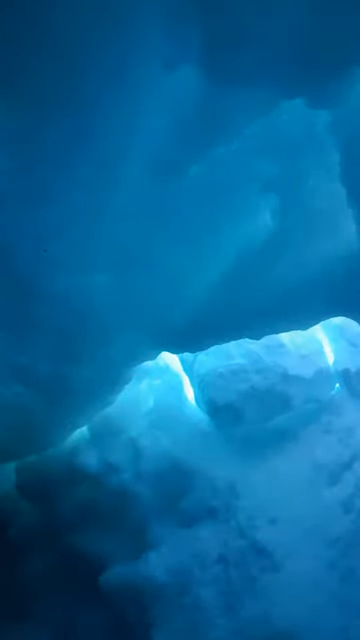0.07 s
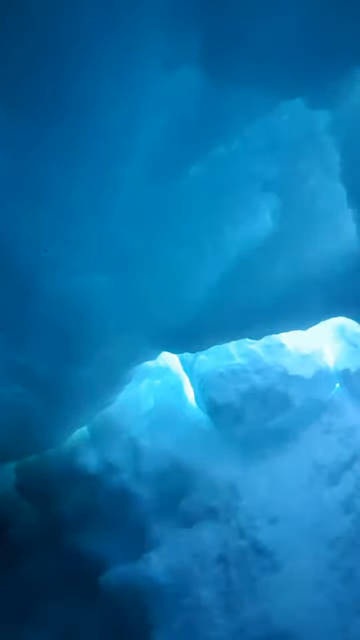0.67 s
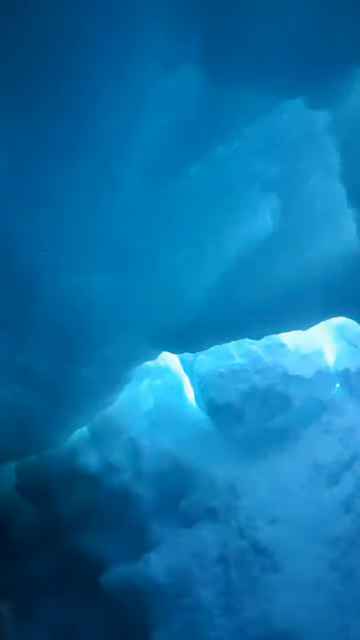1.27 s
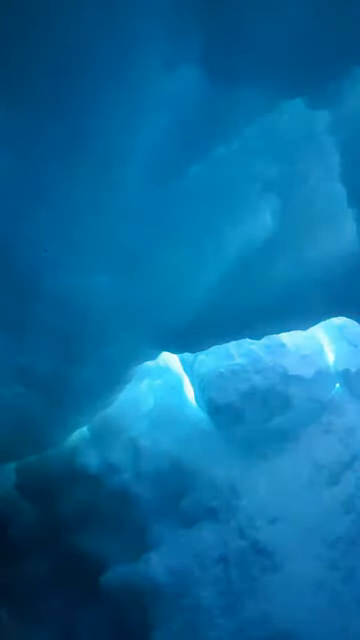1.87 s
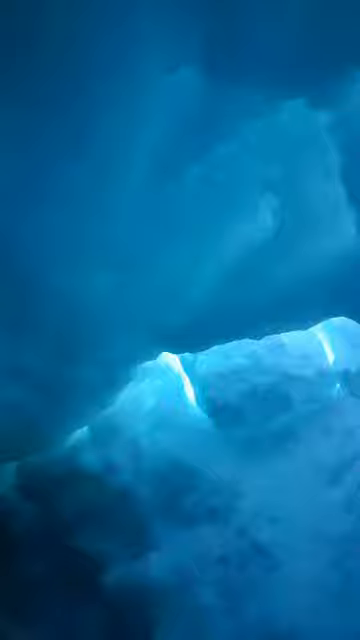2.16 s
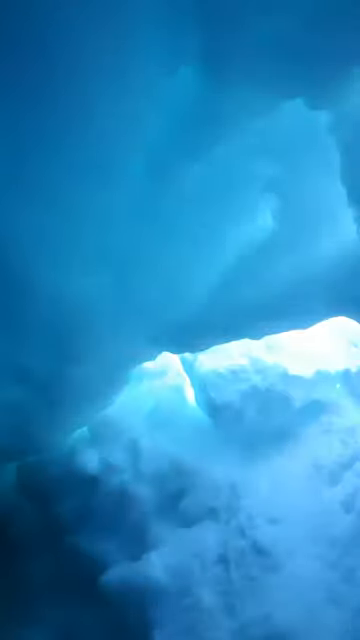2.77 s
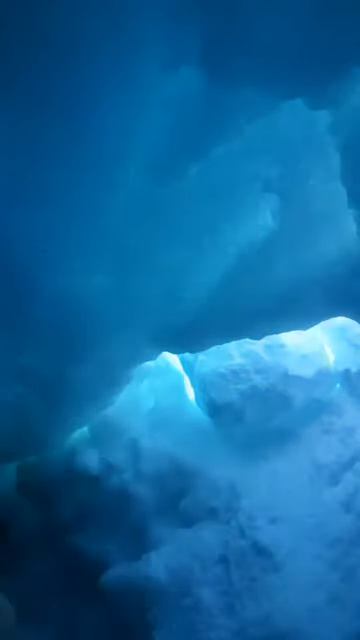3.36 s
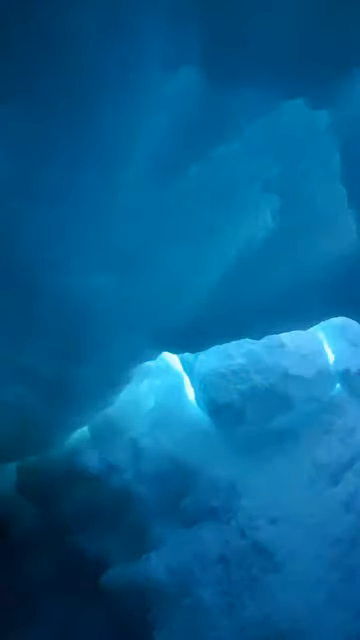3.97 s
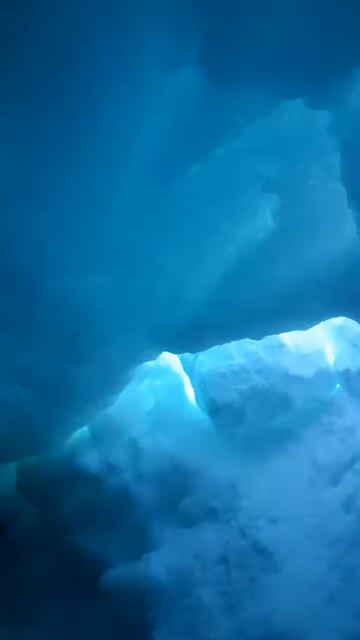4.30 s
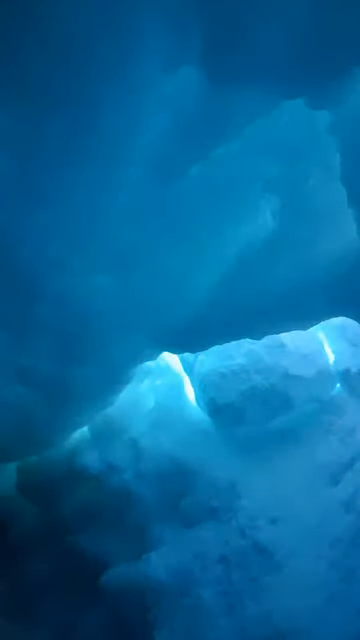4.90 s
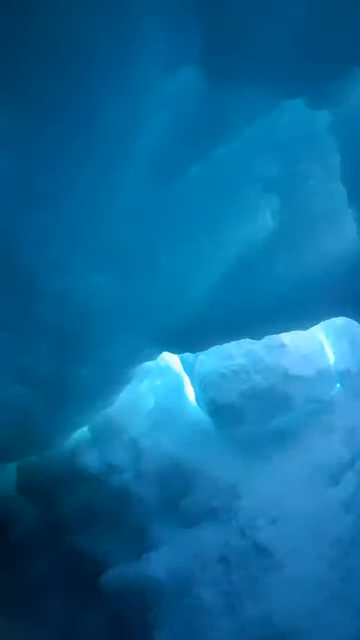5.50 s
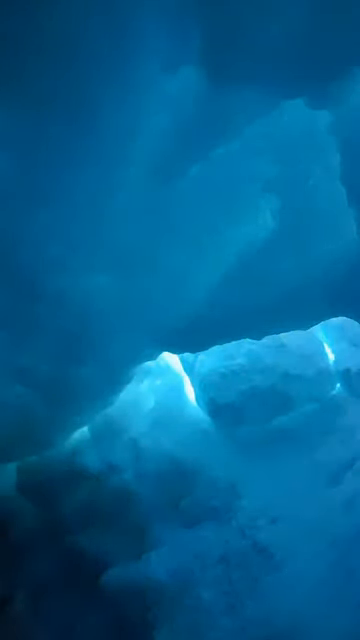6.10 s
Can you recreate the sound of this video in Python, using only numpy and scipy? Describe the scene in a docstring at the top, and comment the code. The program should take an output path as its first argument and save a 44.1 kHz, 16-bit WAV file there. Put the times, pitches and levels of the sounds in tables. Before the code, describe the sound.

A dog treads on packed snow overhead, heard close and without echo from inside a snow hole, slightly brighter on the left. For the first 1.7 seconds its paws scuff and slide softly, with a few dull thuds through the roof. Dry cracks and crunchy knocks start at about 1.7 seconds. From 2.3 seconds the paw blows come thick and heavy, splitting the crust with thin, sharp snaps; the loudest thud lands near 2.7 seconds. Crunching steps continue until about 3.8 seconds. From 4 seconds the movement is lighter, mostly sandy scraping and soft thumps, with a clearer crunch near 4.8 seconds and faint scratches afterwards. A last strong, crunching thud comes at about 6.2 seconds. Under all of it the rubbed snow gives a low, lumpy rumble, small crumbling pops and a fine hiss.

```python
"""Dull thuds, dry cracks and crunching: a dog treads and scuffs on packed snow, heard from a hole below.
Each paw blow thuds through the snow roof, knocks the crust and crushes a cluster of grains.
The crust splits and its icy skin snaps. Between blows the rubbed snow rumbles, crunches and hisses.
Snow soaks up echoes, so all is dry. The microphone's right side hears it slightly later and duller."""
import sys
import numpy as np
from scipy import signal
from scipy.fft import rfft, irfft, next_fast_len
from scipy.io import wavfile
from scipy.ndimage import uniform_filter1d

SR = 44100
rng = np.random.default_rng(int(sys.argv[2]) if len(sys.argv) > 2 else 0)


def put_to_file(sound):
    """Save the sound as 16-bit audio at rate SR, in the file named by the first command-line argument."""
    columns = np.atleast_2d(sound).T  # one column per channel
    safe = np.clip(columns, -1, 1)
    whole_steps = np.round(safe * 32767)
    wavfile.write(sys.argv[1], SR, whole_steps.astype(np.int16))


N = 275580

# paw blows: t/s, thud level/dB, thud f/Hz, knock level/dB, knock f/Hz, crunch level/dB
PAW_BLOWS = [(.574, -32, 160, -44.5, 300, -61), (0.596, -25, 88, -53, 293, -72),
             (0.931, -33.5, 112, -53, 302, -56), (1.35, -27, 85, -53, 286, -67),
             (1.415, -30, 139, -51, 304, -76), (1.483, -39, 120, -50, 375, -46.5),
             (1.736, -36, 170, -29.5, 340, -30), (1.811, -35, 111, -32, 450, -41.5),
             (1.874, -46, 110, -36, 432, -46), (1.943, -51, 130, -37, 380, -40),
             (1.997, -61, 139, -32.5, 416, -53), (2.056, -38, 111, -28, 474, -48),
             (2.112, -51, 120, -35.5, 497, -36.5), (2.133, -35, 119, -42, 326, -64),
             (2.301, -20, 128, -45, 515, -26.5), (2.306, -25, 190, -27, 307, -58),
             (2.328, -29, 72, -24.5, 375, -37), (2.349, -38, 65, -40, 486, -35),
             (2.398, -46, 80, -37, 314, -33), (2.487, -20, 122, -34, 293, -55),
             (2.488, -29, 210, -20, 381, -34), (2.503, -42, 115, -28, 413, -38),
             (2.527, -25.5, 145, -35, 460, -37), (2.574, -40, 120, -45, 320, -54),
             (2.612, -21, 163, -27, 458, -36.5), (2.646, -20.5, 141, -38.5, 290, -41),
             (2.728, -12.5, 129, -15.5, 457, -30.5), (2.769, -29, 185, -29.5, 376, -42),
             (2.79, -41, 110, -29, 424, -38.5), (2.864, -30.5, 104, -36.5, 380, -36),
             (2.892, -32, 115, -27.5, 410, -54), (2.935, -39, 118, -32.5, 380, -41),
             (2.944, -24, 126, -41, 445, -37), (3.071, -28, 109, -31, 363, -57),
             (3.084, -34, 86, -38, 302, -56), (3.206, -31.5, 159, -37.5, 450, -42.5),
             (3.218, -34, 150, -47, 393, -60), (3.367, -38, 112, -34.5, 487, -34.5),
             (3.411, -31, 128, -34, 371, -30.5), (3.442, -31, 101, -54, 380, -37),
             (3.513, -25, 147, -28, 405, -31.5), (3.551, -37, 127, -28, 500, -46),
             (3.584, -36, 141, -31.5, 444, -36), (3.695, -34, 160, -37.5, 440, -49),
             (3.835, -67, 120, -35.5, 480, -57), (4.064, -35.5, 109, -57, 297, -60),
             (4.341, -31.5, 82, -61, 280, -65), (4.484, -41, 146, -43, 405, -45),
             (4.575, -33.5, 110, -52, 300, -65), (4.668, -26, 83, -62, 278, -56),
             (4.695, -31.5, 75, -65, 282, -70), (4.838, -29.5, 104, -34.5, 420, -31.5),
             (4.848, -39, 150, -35, 356, -31.5), (4.906, -33.5, 116, -57, 420, -55),
             (5.02, -46, 120, -39.5, 396, -45), (5.204, -62, 110, -45, 470, -46),
             (5.297, -60, 90, -41, 478, -46), (5.323, -58, 95, -40, 550, -44),
             (5.421, -60, 120, -52, 514, -55), (5.946, -61, 120, -44, 454, -44),
             (6.155, -19, 120, -22.5, 470, -26.5), (6.172, -35, 125, -57, 330, -37),
             (6.201, -25, 118, -30, 444, -26.5), (6.216, -37, 118, -34, 570, -30)]
# paw slides: start t/s, end t/s, rumble level/dB, hiss level/dB, rasp level/dB, f/Hz, width as share of f
PAW_SLIDES = [(0, 0.1, -68, -55.5, -66, 1420, 0.7), (0.085, 0.243, -45.5, -82, -70, 910, 0.46),
              (0.47, 0.572, -47, -51, -44.5, 2300, 2.1), (0.543, 0.648, -43, -76, -58, 845, 0.34),
              (0.695, 0.835, -49, -52.5, -53.5, 2200, 0.93), (0.757, 0.958, -41.5, -78, -51.5, 880, 0.31),
              (0.928, 1.01, -44, -49, -60, 1690, 1.3), (1.035, 1.31, -42, -51, -53, 860, 0.41),
              (1.194, 1.303, -48, -54, -52, 2000, 0.98), (1.286, 1.339, -43, -44, -44, 1800, 1.4),
              (1.298, 1.442, -39, -80, -57, 900, 0.42), (1.43, 1.524, -61, -55, -64, 970, 0.63),
              (1.603, 1.668, -61, -51, -43.5, 880, 0.22), (1.745, 1.904, -42.5, -49, -76, 2500, .9),
              (1.99, 2.19, -43, -67, -61, 875, 0.44), (2.014, 2.104, -60, -54, -49, 12000, .5),
              (2.323, 2.437, -59, -60, -44, 2780, 1), (3.965, 4.02, -50, -42.5, -40.5, 995, 1.6),
              (4.026, 4.182, -58, -52.5, -54, 6500, 0.63), (4.12, 4.41, -48, -60, -48.5, 7100, 0.57),
              (4.127, 4.423, -59, -46, -45.5, 1500, 1.2), (4.29, 4.4, -50, -52, -63, 7500, 0.55),
              (4.598, 4.699, -62, -45, -57, 6500, 0.27), (4.823, 5.07, -47.5, -52.5, -40.5, 850, 0.79),
              (4.9, 5.05, -64, -66, -47.5, 2850, 0.77), (5.206, 5.328, -49, -50, -63, 2500, .9),
              (5.347, 5.456, -52, -51, -56, 1700, 1.3), (5.652, 5.693, -59, -42, -47, 12500, 0.69),
              (5.755, 5.98, -69, -75, -53, 12500, 0.31), (5.79, 6.144, -57, -59, -52.5, 6960, 0.43)]
# tone of snow grains being crushed: f/Hz, level/dB
CRUSH_TONE = [(330, -32), (660, 0), (1130, 1), (1520, -13.5), (1780, -2), (2150, -15.5), (2500, -43),
              (3150, -21), (5100, -29), (12500, -31)]


def paws():
    """The crust gives way with a knock and a crunch of grains; the roof sags and swings back: a thud."""
    # the hollow under the roof hums a little near 300 Hz: f/Hz, level/dB
    hollow_tone = [(15, -15), (45, -0.5), (195, 0), (235, 0), (295, 3.5), (350, 0), (620, -3), (1000, -0.5)]
    out, t = np.zeros((2, N)), np.arange(2048) / SR
    # grains break under the blow, and a few more as the snow settles
    press = swell(t, 0.0018, sharp=0.84) + 0.037 * swell(t, 0.0033, sharp=2.2)
    for start, thud_db, thud_hz, knock_db, knock_hz, crunch_db in PAW_BLOWS:
        pitch_chance, grit_chance = rng.standard_normal(2)
        thud = -damped_swings(t, thud_hz, rise_s=0.0053, sharp=1.7, ragged=0.14)
        knock = damped_swings(t, knock_hz, rise_s=1.1 / knock_hz, sharp=2.1, ragged=0.22)
        overtone = damped_swings(t, 1.545 * knock_hz, rise_s=0.002, sharp=2.1, ragged=0.09)
        knock += gain_of(-7.5) * overtone
        # a heavier crunch breaks the lump into smaller, higher pieces
        lump_hz = 883 * 2 ** ((crunch_db + 41.5) / 111 + 0.054 * pitch_chance)
        lump = damped_swings(t, lump_hz, rise_s=0.0017, sharp=0.36, ragged=0.37)
        coarse = grains(per_s=1800, spread=0.086, ring_s=0.0002, size=len(t))
        crush = colour(press * coarse, CRUSH_TONE, size=512)
        grit = at_level(flying_grit(press), crunch_db - 20 - 1.5 * grit_chance)
        crunch = at_level(lump, -5) + at_level(hollow_ring(t - 0.00131), -8.5) + at_level(crush, -4.5)
        body = at_level(thud, thud_db - 2) + at_level(knock, knock_db + 0.5)
        add(out, start, body + gain_of(crunch_db) * crunch + grit)
    return colour(out, hollow_tone)


def flying_grit(press):
    """Fine grit flies in step with the press of the paw."""
    # thin, bright tone of the grit: f/Hz, level/dB
    grit_tone = [(1300, 0), (2600, 13), (4100, 44), (6100, -10), (9100, -35), (15500, -13)]
    fine = grains(per_s=5000, spread=0.12, ring_s=0.0009, size=len(press))
    return colour(press * fine, grit_tone, size=512)


def hollow_ring(t, vary_db=4.0, detune=0.01):
    """Each hit makes the hollow, or the recorder's body, ring briefly, favouring other notes each time."""
    # notes of the hollow or the recorder's body: f/Hz, level/dB, time to fade by 60 dB/s
    hollow_notes = [(628, 1.5, 0.048), (1247, 19, 0.042), (1814, -12, 0.077), (2320, 14, 0.015),
                    (2620, 4, 0.028), (3030, -15, 0.069), (3650, -17, 0.065), (4100, -21, 0.038),
                    (6100, -9, 0.031)]
    hz, db, fade_s = np.transpose(hollow_notes)[:, :, None]
    strength, shift = rng.standard_normal((2, len(hollow_notes), 1))
    t = np.maximum(t, 0)
    fading = gain_of(db + vary_db * strength - 60 * t / fade_s)
    return np.sum(fading * np.sin(2 * np.pi * hz * (1 + detune * shift) * t), 0)


def cracks():
    """The crust splits at once: one or two swings, a spit of splinters and a faint ring of the hollow."""
    # dry cracks of the crust: t/s, level/dB, f/Hz
    crust_splits = [(1.738, -32, 970), (1.796, -46, 850), (1.875, -38, 776), (1.903, -41, 820),
                    (1.997, -37, 497), (2.023, -41, 603), (2.057, -33, 625), (2.126, -42, 940),
                    (2.15, -39.5, 590), (2.2844, -29, 920), (2.301, -31, 1650), (2.303, -24, 640),
                    (2.332, -31.5, 620), (2.4187, -33, 890), (2.463, -46, 1490), (2.469, -37, 1180),
                    (2.477, -42, 850), (2.489, -32, 655), (2.569, -39, 620), (2.614, -48, 740),
                    (2.631, -38, 750), (2.669, -39, 910), (2.697, -41, 900), (2.719, -43, 1000),
                    (2.729, -23.5, 575), (2.75, -40, 850), (2.835, -44, 656), (2.884, -37, 745),
                    (2.893, -33, 507), (2.903, -44, 900), (3.119, -45, 570), (3.155, -48, 1050),
                    (3.299, -44, 930), (3.354, -41, 960), (3.414, -41, 770), (3.444, -47, 775),
                    (3.469, -40, 700), (3.516, -50, 680), (3.542, -40, 850), (3.553, -32, 710),
                    (3.588, -39, 930), (3.628, -42.5, 647), (3.664, -40.5, 980), (3.696, -44, 750),
                    (3.73, -39, 750), (3.743, -38, 790), (3.755, -39, 690), (3.915, -36, 706),
                    (4.843, -40, 820), (4.954, -45.5, 1010), (5.465, -49.5, 750), (6.154, -28.5, 785),
                    (6.158, -32, 1250), (6.22, -47, 1400)]
    out, t = np.zeros((2, N)), np.arange(1536) / SR
    for start, db, hz in crust_splits:
        split = np.sin(2 * np.pi * hz * t) * swell(t, 0.29 / hz, sharp=0.45)
        bits = grains(per_s=4600, spread=0.093, ring_s=0.00098, size=len(t))
        splinters = colour(bits * swell(t, 0.00046, sharp=0.41), CRUSH_TONE, size=512)
        crack = at_level(split, 0) + at_level(splinters, -7) + at_level(hollow_ring(t), -19)
        add(out, start, gain_of(db) * crack)
    return out


def snaps():
    """The icy skin breaks with a thin, sharp click about a millisecond long."""
    # breaks of the icy skin: t/s, level/dB, centre f/Hz
    skin_breaks = [(1.738, -43, 6000), (2.284, -36, 3160), (2.3018, -36, 3980), (2.301, -51, 11000),
                   (2.302, -45, 10000), (2.419, -47, 3800), (2.728, -58, 5000), (2.7298, -50, 11000),
                   (2.749, -55, 9000), (3.4124, -48, 5460), (3.4151, -47.5, 2500)]
    out, t = np.zeros((2, N)), np.arange(512) / SR
    for start, db, hz in skin_breaks:
        noise = rng.standard_normal(len(t)) + 0.5 * rng.standard_normal((2, len(t)))
        click = noise * swell(t, 0.00018, sharp=0.8)
        add(out, start, at_level(band(click, hz, 0.6 * hz), db))
    return out


def scratches():
    """A brief rasp of icy grains; finer grains sound higher."""
    # short scratches on the icy crust: t/s, level/dB, centre f/Hz
    crust_scratches = [(.031, -52.5, 1180), (.058, -59, 3600), (0.089, -55, 2290), (0.327, -56, 2350),
                       (0.427, -49.5, 2640), (.505, -49, 2500), (.551, -47, 2950), (.629, -54.5, 8900),
                       (1.299, -51, 3460), (1.726, -44, 4870), (2.032, -43.5, 5700), (2.271, -51, 2600),
                       (2.286, -40, 2800), (2.301, -35, 2800), (2.328, -49, 4000), (2.353, -46, 2500),
                       (2.728, -31, 2300), (2.735, -37, 2060), (3.352, -55, 8000), (3.414, -39.5, 2520),
                       (3.444, -50, 3870), (3.814, -49.5, 11000), (3.89, -47, 2160), (3.933, -63, 14100),
                       (4.503, -56, 10000), (4.527, -51, 9000), (4.722, -47.5, 2360), (4.844, -39.5, 3630),
                       (5.346, -52, 7500), (5.388, -52, 12000), (5.666, -46.5, 2300), (6.196, -44, 5000),
                       (6.217, -45, 3500)]
    out, t = np.zeros((2, N)), np.arange(1536) / SR
    for start, db, hz in crust_scratches:
        icy = grains(per_s=2800, spread=0.38, ring_s=0.0008, size=len(t))
        rasp = band(icy * swell(t, 0.0007, sharp=0.32), hz, 0.93 * hz)
        add(out, start, at_level(rasp, db))
    return out


def slides():
    """A sliding paw rasps in one band: low and hollow on packed snow, a sandy swish on loose crystals."""
    out = np.zeros((2, N))
    rubbing = patchy(grains(per_s=5000, spread=0.3, ring_s=0.00088, size=N), depth_db=2.0)
    rubbing *= gain_of(4.5 * waver(rate_hz=350))  # a fast stutter
    for start, end, _, _, db, hz, width in PAW_SLIDES:
        pressure = slide_pressure(start, end)
        stretch = rubbing[:, round(start * SR):][:, :len(pressure)]
        rasp = unit_level(band(stretch, hz, width * hz))
        add(out, start, gain_of(db - 4.5) * rasp * pressure)
    return out


def slide_pressure(start, end, taper_share=0.49, ease_db=2):
    """A sliding paw presses in, eases slightly along its stroke and lifts off."""
    progress = np.linspace(-0.5, 0.5, round(end * SR) - round(start * SR))
    return signal.windows.tukey(len(progress), taper_share) * gain_of(-ease_db * progress)


def scuffing():
    """Rubbed snow sticks and slips: a lumpy rumble through the roof, crunching, pops and a fine hiss."""
    # tones of the rumbling roof, the breaking lumps and the sliding crystals: f/Hz, level/dB
    rumble_tone = [(15, -61), (25, -5), (42, -5.5), (85, 1.5), (135, -0.5), (225, -5), (305, -6),
                   (420, -14), (620, -25.5), (1300, -51.5)]
    crunch_tone = [(220, -22), (430, 4.5), (640, -11.5), (980, 2), (1480, -4), (1780, -7), (2180, -9.5),
                   (2550, -16), (3400, -12.5), (5200, -17), (12500, -83)]
    hiss_tone = [(850, 2.5), (2100, 7.5), (3500, 4), (4700, 5.5), (6100, 3.5), (8100, 3), (9300, 3),
                 (12600, -2), (15900, -0.5)]
    rumble_gain, crunch_gain, hiss_gain = rubbing_levels() * gain_of(waver(rate_hz=10.4))
    slips, bumps = waver(rate_hz=120), waver(rate_hz=10.6)
    push = rng.standard_normal(N) + 0.22 * rng.standard_normal((2, N))
    lumps = grains(per_s=2100, spread=0.4, ring_s=0.0015, size=N)
    crystals = patchy(grains(per_s=5000, spread=0.41, ring_s=0.0008, size=N), depth_db=1.8)
    rumble = unit_level(colour(push * gain_of(2 * bumps), rumble_tone))
    crunch = unit_level(colour(lumps * gain_of(2.5 * slips), crunch_tone))
    hiss = unit_level(colour(crystals * gain_of(2 * slips), hiss_tone))
    crackle = gain_of(-2) * crunch + gain_of(-4) * pops()
    return rumble_gain * rumble + crunch_gain * crackle + gain_of(-3) * hiss_gain * hiss


def rubbing_levels():
    """How loud the rumble, crunch and hiss are: shuffling, plus slides, plus settling after each blow."""
    # shuffling that goes on throughout: t/s, rumble level/dB, crunch level/dB, hiss level/dB
    shuffling = [(0, -45.5, -56, -55.5), (.28, -50.5, -65, -60.5), (.54, -50, -57, -54),
                 (.88, -47.5, -63.5, -55.5), (1.2, -51, -54.5, -56.5), (1.38, -48, -59.5, -54.5),
                 (1.75, -41, -58, -51.5), (2.2, -44, -48, -47.5), (2.48, -40, -42, -48),
                 (3.05, -43, -48, -48), (3.5, -42.5, -45, -51), (3.72, -38.5, -45.5, -55.5),
                 (3.9, -44.5, -48.5, -49), (4.3, -47, -50, -47), (4.75, -42.5, -55.5, -50),
                 (5.08, -51, -49.5, -53.5), (5.18, -51.5, -55.5, -59.5), (5.4, -40.5, -51, -49),
                 (5.5, -45, -54.5, -50.5), (5.6, -44.5, -54, -53), (5.85, -48, -56, -44.5),
                 (6.12, -49.5, -49.5, -47), (6.25, -47, -38.5, -42.5)]
    times, *levels = np.transpose(shuffling)
    power = np.array([gain_of(np.interp(np.arange(N) / SR, times, db)) for db in levels]) ** 2
    for start, end, rumble_db, hiss_db, *_ in PAW_SLIDES:
        gains = [gain_of(rumble_db), 0, gain_of(hiss_db)]
        add(power, start, np.outer(gains, slide_pressure(start, end)) ** 2)
    settle = swell(np.arange(8192) / SR, 0.01, sharp=0.98)
    for start, thud_db, *_ in PAW_BLOWS:
        rumble_db = -45 + 0.59 * (thud_db + 32.5)  # a harder thud leaves a louder rumble
        add(power[:1], start, (gain_of(rumble_db) * settle) ** 2)
    return np.sqrt(power)


def pops(per_s=180, low_hz=560, high_hz=1900, range_db=19):
    """Small lumps collapse in a dense crumble, each with a short, dry pop of its own pitch."""
    out, t = np.zeros((1, N)), np.arange(384) / SR
    when, pitch, chance = rng.random((round(per_s * N / SR), 3)).T[:, :, None]
    hz = low_hz * (high_hz / low_hz) ** pitch
    sizes = gain_of(range_db * chance) * (low_hz / hz) ** 0.091
    sounds = sizes * np.sin(2 * np.pi * hz * t) * swell(t, 0.32 / hz, sharp=0.56)
    for start, pop in zip(when[:, 0] * N / SR, sounds):
        add(out, start, pop)
    return unit_level(out)


def microphone_hiss():
    """The faint, steady hiss of each side of the microphone."""
    return gain_of(-74) * rng.standard_normal((2, N))


def grains(per_s, spread, ring_s, size, direct=0.05):
    """Snow grains snap at random in tiny bursts, partly direct and partly scattered to each side."""
    sizes = np.exp(spread * np.minimum(rng.exponential(1, size), 4))
    breaks = (rng.random(size) < per_s / SR) * sizes ** 2
    power = signal.lfilter([1], [1, -np.exp(-2 / (ring_s * SR))], breaks)
    straight = np.sqrt(direct) * rng.standard_normal(size)
    scattered = np.sqrt(1 - direct) * rng.standard_normal((2, size))
    return unit_level(np.sqrt(power + 1e-9) * (straight + scattered))


def damped_swings(t, hz, rise_s, sharp, ragged):
    """A few quickly fading swings that peak at rise_s; the pitch wanders as the snow crumbles."""
    wander = unit_level(uniform_filter1d(rng.standard_normal(len(t)), size=60))
    turns = np.cumsum(hz * (1 + ragged * wander)) / SR
    return np.cos(2 * np.pi * (turns - np.interp(rise_s, t, turns))) * swell(t, rise_s, sharp)


def patchy(x, depth_db, size=12):
    """Ever new crystals are rubbed, so the tone shifts in patches some 2 kHz wide and 20 ms long."""
    spectra = signal.stft(x, nperseg=256, noverlap=192)[2]
    chance = rng.standard_normal(spectra.shape[:0:-1])
    patches = unit_level(uniform_filter1d(uniform_filter1d(chance, size, 0), size, 1))
    spectra = spectra * gain_of(depth_db * patches.T)
    return unit_level(signal.istft(spectra, nperseg=256, noverlap=192)[1][:, :N])


def swell(t, rise_s, sharp):
    """Rises to 1 at rise_s, then dies away; a larger sharp makes it shorter."""
    u = np.maximum(t, 0) / rise_s
    return (u * np.exp(1 - u)) ** sharp


def waver(rate_hz):
    """A smooth random wobble, up to about that rate."""
    size = next_fast_len(N, True)
    hz = np.fft.rfftfreq(size, 1 / SR)
    spectrum = rfft(rng.standard_normal(size)) * np.exp(-(hz / rate_hz) ** 2)
    return unit_level(irfft(spectrum, size)[:N])


def colour(x, tone, size=4096):
    """Gives a sound the tone in a table, with no ringing ahead of a hit (a minimum-phase filter)."""
    tone_hz, tone_db = np.transpose(tone)
    hz = abs(np.fft.fftfreq(size, 1 / SR))
    log_gain = np.log(gain_of(np.interp(np.log(hz + 1), np.log(tone_hz), tone_db)))
    taps = np.fft.ifft(np.exp(signal.hilbert(log_gain).conj())).real[:size // 2]
    return signal.oaconvolve(x, taps[None], axes=1)[:, :x.shape[-1]]


def band(x, hz, width_hz):
    """Keeps the pitches around hz; filtering twice makes the edges steep."""
    hz, width_hz = np.clip([hz, width_hz], 50, 15000)
    b, a = signal.iirpeak(hz, hz / width_hz, SR)
    return signal.lfilter(b, a, signal.lfilter(b, a, x))


def gain_of(db):
    """Turns decibels into a multiplier."""
    return 10 ** (np.asarray(db) / 20)


def unit_level(x):
    """Scales a sound to an average (rms) size of 1."""
    return x / np.sqrt(np.mean(x ** 2) + 1e-20)


def at_level(x, db, held_s=0.01):
    """Gives a short sound the energy of that level held for held_s."""
    return gain_of(db) * x / np.sqrt(np.sum(x ** 2, -1, keepdims=True) / (held_s * SR) + 1e-20)


def add(mix, start, sound):
    """Adds a sound to the mix at start, in seconds."""
    part = mix[:, max(round(start * SR), 0):][:, :sound.shape[-1]]
    part += sound[..., :part.shape[1]]


def scene():
    """All sounds reach the microphone's left opening first; the right one hears them later and duller."""
    # both openings slightly favour the sandy treble and have a dip just above it: f/Hz, level/dB
    opening_tone = [(3500, 0), (4500, -1.5), (5700, 0), (7300, 1.2), (8400, 0), (9200, -4), (10300, -1.5),
                    (11200, .5), (13000, .5), (15500, -.5)]
    # the right opening faces away and loses treble: f/Hz, level/dB
    right_tone = [(60, 2.4), (200, 2.4), (380, .5), (700, -4.6), (1300, -7), (2400, -7.5), (4400, -8),
                  (6200, -10), (7200, -13), (8100, -24), (9300, -17), (10700, -19), (14500, -14)]
    # the way round the microphone's body delays the right side: f/Hz, delay/s
    right_delay = [(150, .0004), (430, .00024), (950, .00029), (1400, .0005), (3000, .00038)]
    left, right = rfft(paws() + cracks() + snaps() + scratches() + scuffing() + slides())
    hz = np.fft.rfftfreq(N, 1 / SR)
    curves = map(np.transpose, (opening_tone, right_tone, right_delay))
    both_db, right_db, delay_s = (np.interp(np.log(hz + 1), np.log(f), value) for f, value in curves)
    right *= gain_of(right_db) * np.exp(-2j * np.pi * hz * delay_s)
    return irfft(np.array([left, right]) * gain_of(both_db), N)


def record(dry):
    """The microphone adds its own faint hiss, and the very highest treble is cut off."""
    top_hz = 15830
    taps = signal.firwin(511, top_hz, window=("kaiser", 9), fs=SR)
    return signal.oaconvolve(dry + microphone_hiss(), taps[None], "same")


dry = scene()
out = record(dry)
put_to_file(out)
```